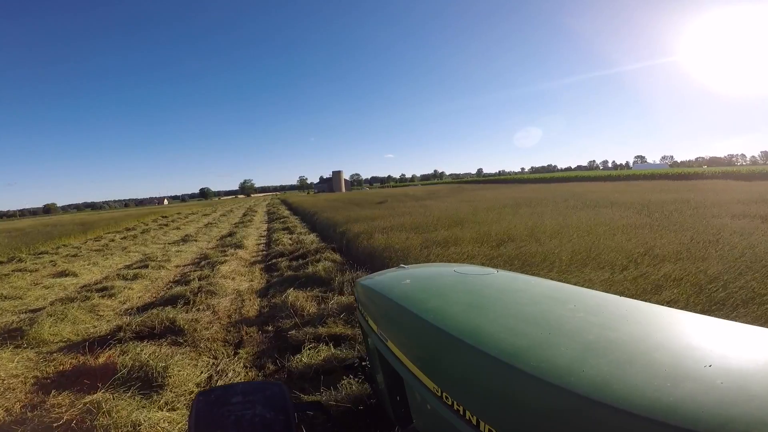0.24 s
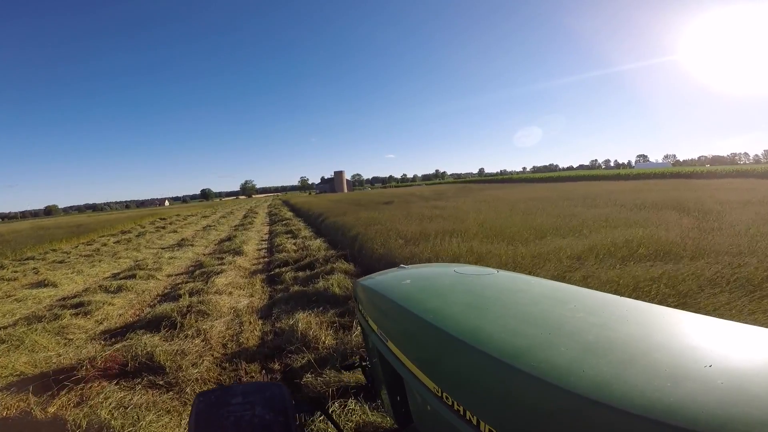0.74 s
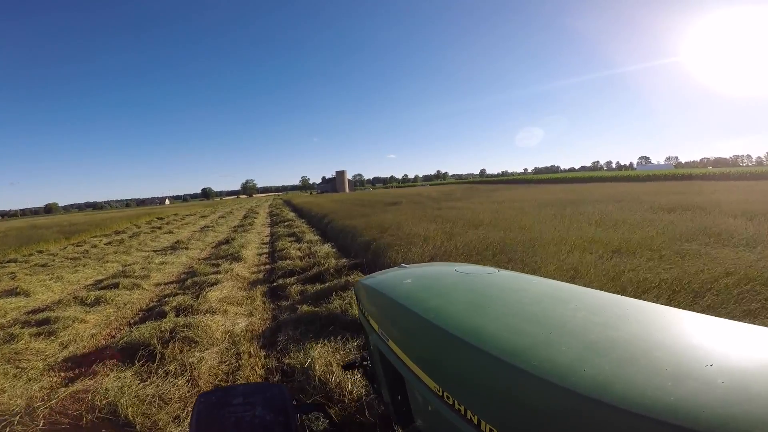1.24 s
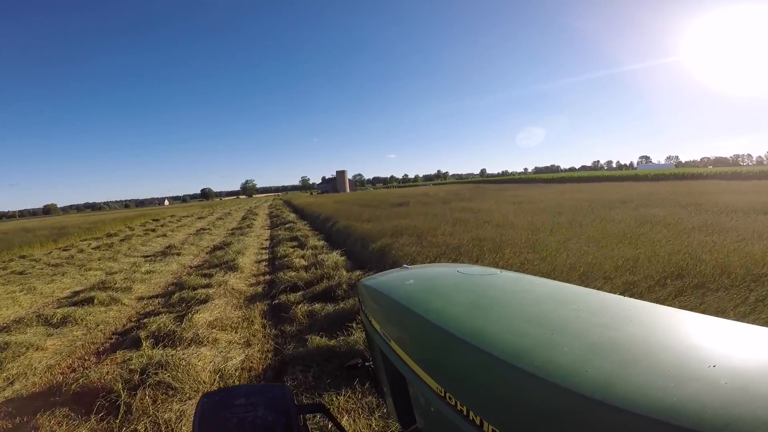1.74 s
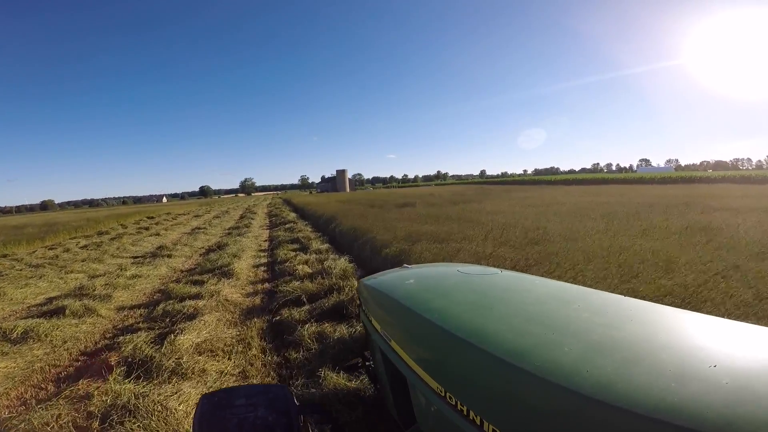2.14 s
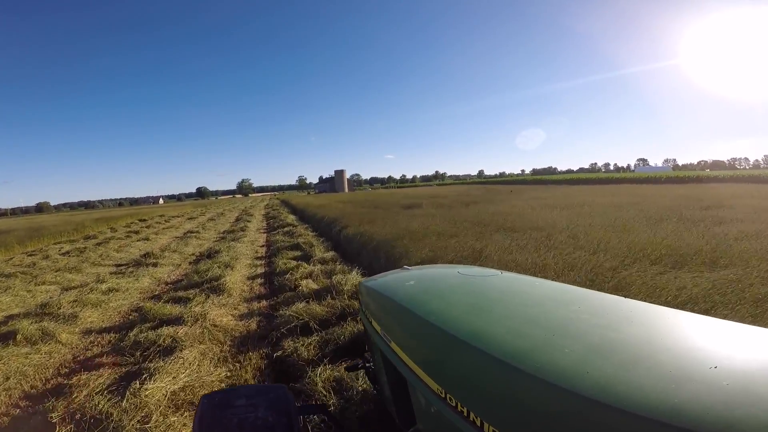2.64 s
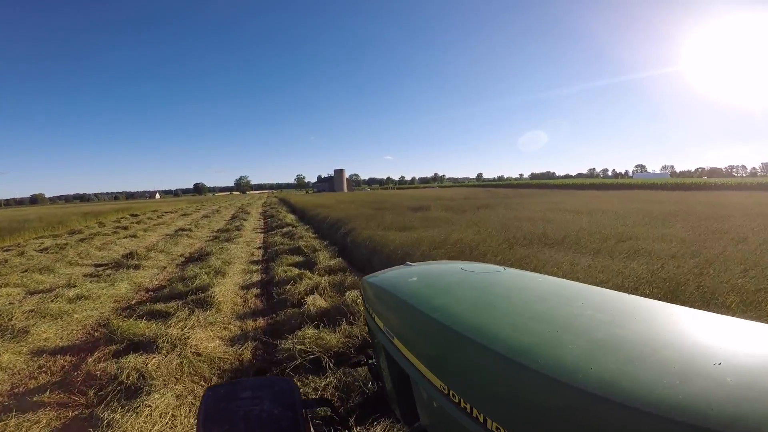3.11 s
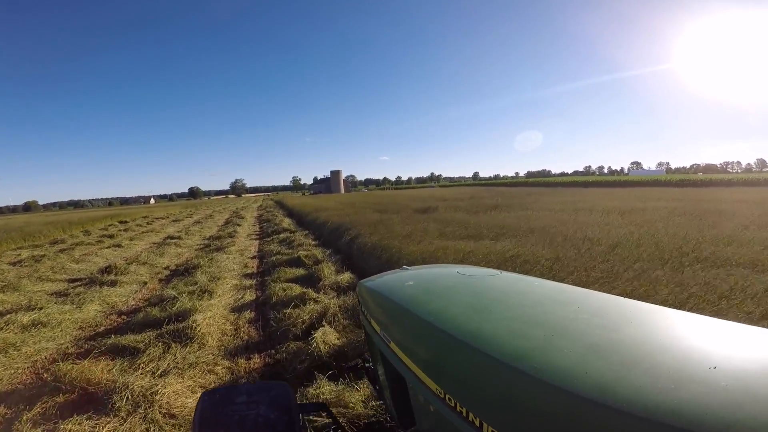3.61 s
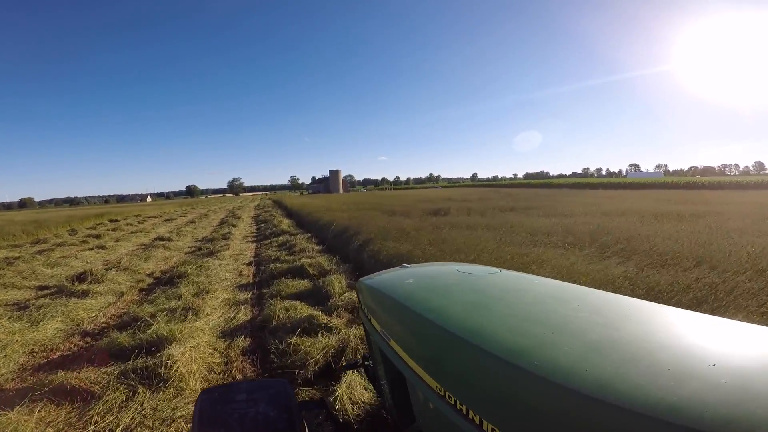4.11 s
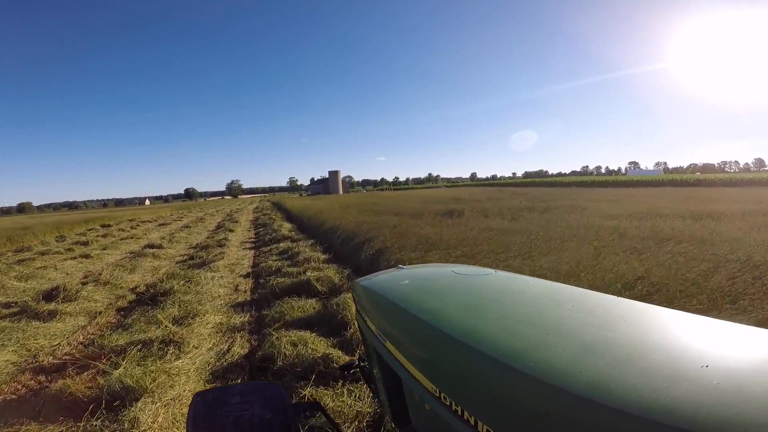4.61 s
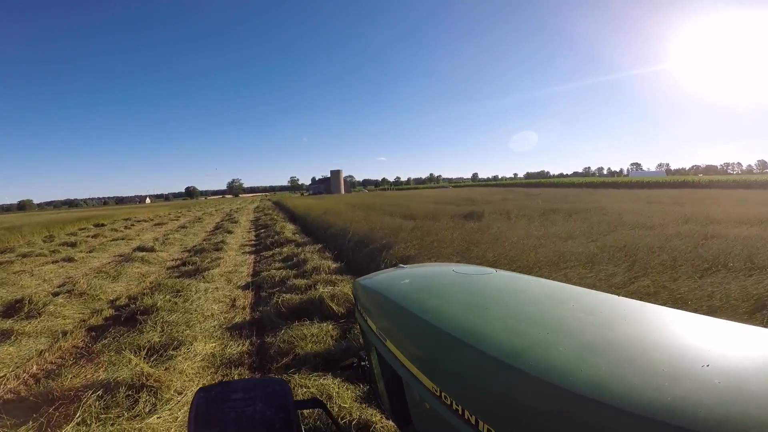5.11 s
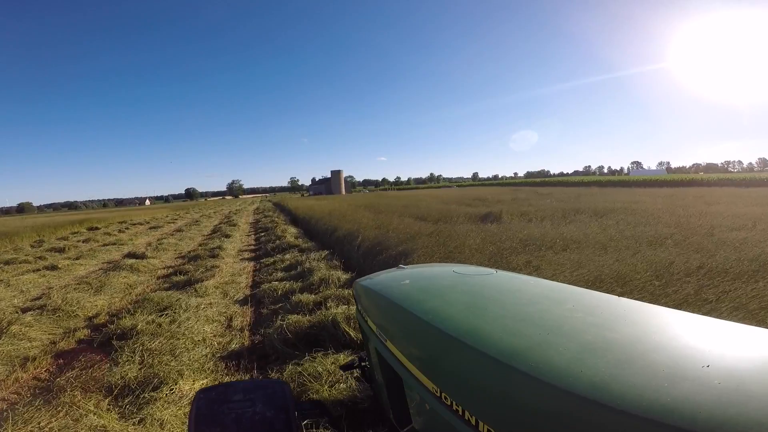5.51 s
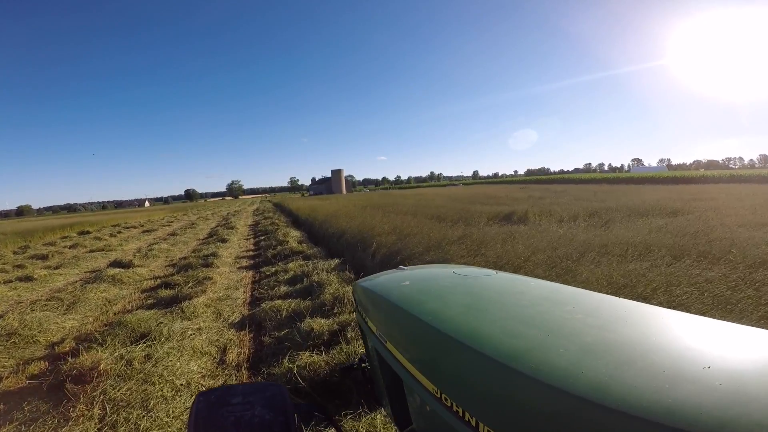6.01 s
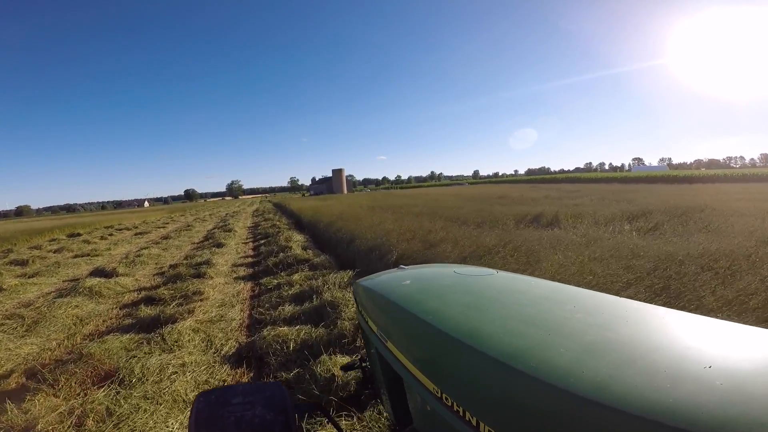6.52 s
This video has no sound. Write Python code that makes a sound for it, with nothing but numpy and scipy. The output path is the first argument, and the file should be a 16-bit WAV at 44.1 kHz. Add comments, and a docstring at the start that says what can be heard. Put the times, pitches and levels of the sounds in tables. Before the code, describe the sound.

A tractor diesel drones steadily under load at close range while a mower hums and slashes tall grass with a rough, surging rush.

```python
"""Tractor mowing tall grass

A six-cylinder diesel tractor pulls a disc mower through tall grass, heard from the tractor itself.
The exhaust drones on tones locked to the engine cycle; shaped noise makes the knocks and valve clatter.
The mower discs hum as tones, and their cutting is noise that surges with the crop.
The driveline drones, the hood booms, panels and tyres rumble over the field, and fan air and stalks hiss."""
import sys
import numpy as np
from scipy import signal
from scipy.fft import rfft, irfft
from scipy.io import wavfile
from scipy.ndimage import uniform_filter1d

SR = 44100
rng = np.random.default_rng(int(sys.argv[2]) if len(sys.argv) > 2 else 0)


def digitize_waveform(pressure):
    """Quantize a signal to 16-bit integers and store it at the path in sys.argv[1].

    Rows of a 2-D input are taken as channels; values are limited to [-1, 1].
    """
    field = np.atleast_2d(pressure).T
    bounded = np.clip(field, -1, 1)
    quanta = np.round(bounded * 32767).astype(np.int16)
    wavfile.write(sys.argv[1], SR, quanta)


N = 297675
T = np.arange(N) / SR  # time of each sample [s]


def undb(db):
    """Turn decibels into a gain."""
    return 10 ** (np.asarray(db) / 20)


def unit(x):
    """Scale a signal to an rms of 1."""
    return x / np.sqrt(np.mean(x ** 2))


def curve(table):
    """Join the points of a (time [s], value) table by straight lines."""
    return np.interp(T, *np.transpose(table))


def noise():
    """Make white noise, which holds all pitches equally."""
    return rng.standard_normal(N)


def walk(rate):
    """Draw a smooth random curve of rms 1 that changes about rate times a second."""
    knots = rng.standard_normal(1024)
    jagged = np.interp(T * rate, np.arange(len(knots)), knots)
    return unit(uniform_filter1d(jagged, int(SR / rate / 2) + 1))


def frequencies():
    """List the frequencies of the spectrum [Hz], kept at 1 or above to allow logs and division."""
    return np.maximum(np.fft.rfftfreq(N, 1 / SR), 1)


def colour(x, points):
    """Shape a sound by a (frequency [Hz], level [dB]) spectrum, then scale it to rms 1."""
    hz, db = np.transpose(points)
    gain_db = np.interp(np.log(frequencies()), np.log(hz), db)
    return unit(irfft(rfft(x) * undb(gain_db), N))


def ring(x, modes):
    """Pass a sound through steep (frequency [Hz], width [Hz], level [dB]) resonances; rms 1."""
    f = frequencies()
    power = 0
    for hz, width, db in modes:
        band = undb(db) / (1 + .5j * hz / width * (f / hz - hz / f)) ** 2
        # separate resonances add in power, so no notch forms between them
        power = power + np.abs(band) ** 2
    return unit(irfft(rfft(x) * np.sqrt(power), N))


def tone(turns, waver_db, wander, rate):
    """Make a sine from a count of turns; its level wavers [dB] and its phase wanders [radians]."""
    phase = 2 * np.pi * (turns + rng.random()) + wander * walk(rate)
    return np.sqrt(2) * np.sin(phase) * undb(waver_db * walk(rate))


def swell(s, length):
    """Rise and fall in a bell shape around time s; length is its standard deviation [s]."""
    return np.exp(-.5 * ((T - s) / length) ** 2)


def spell(start, length, attack, release):
    """Rise, hold, then die away; all times in seconds."""
    rise = np.clip((T - start) / attack + .5, 0, 1)
    return rise * np.exp(-np.maximum(T - start - length, 0) / release)


# engine load, as a change in loudness: (time [s], level [dB])
ENGINE_LOAD = [(0, -0.5), (.5, -1.6), (.9, -.5), (1.6, -3), (2.3, 0.5), (3.5, 0.5), (4.05, -0.5),
               (4.7, 2.3), (5.3, 2.5), (6, 1), (6.75, 2)]


def engine_load():
    """Follow the load [dB] that strengthens knock, panel rumble, hiss and exhaust tones."""
    return curve(ENGINE_LOAD)


# thickness of the crop at the knives, as a level before cutting is lifted 0.08 dB: (time [s], level [dB])
CROP_THICKNESS = [(0.0, -49), (0.22, -44.5), (0.76, -47.5), (0.91, -42), (0.97, -45.5), (1.31, -48),
                  (1.47, -51.5), (2.44, -46.5), (3.23, -50.5), (3.58, -45.5), (3.6, -47.5), (4.12, -49.5),
                  (4.16, -48), (5.95, -46.5), (6.19, -49.5), (6.7, -45)]


def crop_level():
    """Follow the crop thickness [dB] that drives both cutting and hiss."""
    return curve(CROP_THICKNESS)


# spectrum of the tyre rumble: (frequency [Hz], level [dB])
TYRE_SPECTRUM = [(12, -5), (24, 0), (35, 1.5), (46, -5), (70, -4.5), (140, -12), (400, -71)]
# bumps in the field that thud through the tyres: (time [s], level [dB])
FIELD_BUMPS = [(.93, -45), (2.31, -52), (3.55, -58), (5.93, -50)]
BUMP_S = 0.065  # standard deviation of each thud's bell shape [s]
ROLLING_DB, ROLLING_SWAY_DB = -53, 1  # rolling level and the spread of its sway [dB]


def tyres():
    """Rolling over stubble makes an uneven low rumble, and each bump briefly swells it to a thud."""
    rolling = undb(ROLLING_DB + ROLLING_SWAY_DB * walk(6))
    thuds = sum(undb(db) * swell(s, BUMP_S) for s, db in FIELD_BUMPS)
    return colour(noise(), TYRE_SPECTRUM) * np.hypot(rolling, thuds)


# spectrum of fan air and stalks: (frequency [Hz], level [dB])
AIR_SPECTRUM = [(1500, -20), (2800, 1.5), (3900, 3.5), (4700, -1), (5200, 0.5), (5650, -2), (6500, 0),
                (7050, -7), (8150, -7.5), (9000, -14), (10000, -24), (10700, -31), (12500, -38.5),
                (14000, -54)]
HISS_DB = -59.5  # level before crop and load change it [dB]
HISS_PER_CROP, HISS_PER_LOAD = 0.41, .42  # dB gained below the top for each dB of crop and of load
TOP_PER_LOAD = 2  # dB the top gains for each dB of load


def air(cycle, firings):
    """Fan air and flying stalks hiss, throbbing with the engine; crop and load change the level."""
    crop_db, load_db = crop_level(), engine_load()
    cycle_throb = 0.59 * np.sin(2 * np.pi * cycle)
    firing_throb = 0.33 * np.sin(2 * np.pi * firings)
    throb_db = cycle_throb + firing_throb + 0.44 * walk(40)
    hiss = undb(HISS_DB) * colour(noise() * undb(throb_db), AIR_SPECTRUM)
    # the part above 8000 Hz follows the load alone
    high_pass = signal.butter(2, 8000, "high", fs=SR, output="sos")
    top = signal.sosfiltfilt(high_pass, hiss)
    surge_db = HISS_PER_CROP * (crop_db - crop_db.mean()) + HISS_PER_LOAD * load_db
    return (hiss - top) * undb(surge_db) + top * undb(TOP_PER_LOAD * load_db)


# body panel resonances: (frequency [Hz], width [Hz], level [dB])
PANEL_MODES = [(67, 16.7, 6), (98, 17.6, 7), (110, 12, 3.5), (128, 13, 3), (179, 26, 0), (276.5, 18, 0.5),
               (299.7, 30, 1), (350, 60, -7), (450, 91, -10)]


def panels():
    """Body panels rumble as noise rings their resonances, a little louder under load."""
    return undb(engine_load() * 0.42 - 43.0) * ring(noise(), PANEL_MODES)


# spells in which the hood booms: (start [s], length [s], level [dB])
BOOM_SPELLS = [(0.372, 0.085, -38), (0.903, 0.42, -39), (1.368, 0.2, -38)]
BOOM_HZ = 97.04  # a little below the firing rate, so the two beat
BOOM_REST_DB, BOOM_ATTACK_S, BOOM_RELEASE_S = -51.5, 0.039, .07


def hood_boom():
    """The hood booms at its own fixed pitch, louder in spells and never below a resting level."""
    spells = [undb(db) * spell(s, length, BOOM_ATTACK_S, BOOM_RELEASE_S) for s, length, db in BOOM_SPELLS]
    level = np.maximum(np.max(spells, axis=0), undb(BOOM_REST_DB))
    return tone(BOOM_HZ * T, waver_db=1, wander=0.57, rate=10) * level


# level of the deep driveline drone, which swells and sinks: (time [s], level [dB])
DRONE_LEVEL = [(0, -44), (.35, -54), (.7, -44.5), (1, -53), (1.75, -51), (1.95, -41.5), (2.25, -43.5),
               (2.92, -37.5), (3.25, -43), (3.48, -39.5), (3.85, -40), (4.3, -52.5), (4.6, -46),
               (5.02, -57), (5.2, -39), (5.55, -44), (6.3, -46.5), (6.75, -39.5)]
DRONE_PER_CYCLE = 3.26  # swings of the drone per engine cycle


def driveline_drone(cycle):
    """The driveline drones at a deep pitch that follows the engine speed."""
    return tone(DRONE_PER_CYCLE * cycle, waver_db=1.7, wander=0.091, rate=6.5) * undb(curve(DRONE_LEVEL))


# mower disc speed: (time [s], speed [turns per second])
DISC_TURN_RATE = [(0, 44.2), (1.3, 43.7), (2.2, 44.4), (3.8, 44.4), (4.8, 44), (5.5, 43.4), (6.75, 43.2)]
# mower disc tones: (multiple of the disc turn, level [dB])
DISC_HUM = [(2, -50.5), (3, -50.5), (4, -57), (6, -55.5)]


def disc_hum():
    """Spinning discs hum at multiples of their turning rate."""
    turns = np.cumsum(curve(DISC_TURN_RATE)) / SR
    return sum(undb(db) * tone(multiple * turns, waver_db=2.0, wander=0.34, rate=5.4)
               for multiple, db in DISC_HUM)


# spectrum of knives slashing grass: (frequency [Hz], level [dB])
CUTTING_SPECTRUM = [(140, -15), (240, 3.5), (400, 0), (600, 0), (820, -2), (1030, 0.5), (1280, -5),
                    (1430, -8.5), (1900, -9), (2350, -10.5), (2800, -17.5), (4000, -25.5), (7000, -56.5),
                    (10000, -63), (13000, -79)]


def cutting():
    """Knives slash the crop: flickering noise that surges with the crop thickness."""
    flicker = undb(1.0 * walk(60))
    return colour(noise() * flicker, CUTTING_SPECTRUM) * undb(crop_level() + 0.08)


# clumps of grass ring the mower deck, and at the last a stalk scrapes past; length is a standard deviation:
# (time [s], frequency [Hz], width [Hz], length [s], level [dB])
GRASS_CLUMPS = [(0.318, 1040, 80, .015, -44.5), (0.435, 614, 70, 0.015, -43.5),
                (0.887, 975, 350, 0.027, -50), (1.34, 1040, 130, 0.02, -51), (3.525, 970, 300, 0.1, -51),
                (3.565, 4400, 220, .008, -62)]


def clumps():
    """Each clump or stalk makes a short swell of noise through one resonance."""
    return sum(undb(db) * swell(s, length) * ring(noise(), [(hz, width, 0)])
               for s, hz, width, length, db in GRASS_CLUMPS)


# engine block and cover resonances: (frequency [Hz], width [Hz], level [dB])
BLOCK_MODES = [(705, 240, -2), (1028, 106, -1.5), (1226, 115, 4), (1555, 83, -1.5), (1814, 130, -1),
               (2048, 132, 0.5), (2310, 200, -5)]
# knock strength of each cylinder in firing order: (level [dB])
CYLINDER_KNOCK = [-0.7, -2.5, -0.5, -1, -1.5, -1]


def knock(cycle, firings):
    """Each firing rattles the block; the valve gear adds a clatter that repeats every cycle."""
    strength = undb(CYLINDER_KNOCK)[firings.astype(int) % len(CYLINDER_KNOCK)]
    # each firing jumps up, then fades towards a steady part
    burst = strength * (.65 + np.exp(-(firings % 1) / .35))
    taps = rng.standard_normal(2048)
    clatter = np.interp(cycle % 1, np.linspace(0, 1, len(taps)), taps)
    return undb(engine_load() - 52.5) * ring(burst * (noise() + 0.87 * clatter), BLOCK_MODES)


# exhaust and gear tones, level at zero load: (multiple of the two-turn engine cycle, level [dB])
ENGINE_ORDERS = [(8, -58), (9, -56), (11, -60.5), (12, -63.5), (16, -65), (18, -55), (19, -68.5), (23, -68),
                 (24, -58), (33, -70), (36, -72), (38, -64.5), (39, -71), (40, -66.5), (42, -66.5),
                 (43, -68.5), (70, -65.5), (75, -71.5), (87, -74), (102, -78.5), (118, -67.5)]
FIRING_DB = -43.5  # level of the firing tone [dB]


def exhaust(cycle, firings):
    """The firing tone sounds with weaker orders from unequal cylinders; load lifts high ones most."""
    load_db = engine_load()
    total = undb(FIRING_DB) * tone(firings, waver_db=2.0, wander=0.05, rate=5.3)
    for order, db in ENGINE_ORDERS:
        level = undb(db + min(order / 45, 1.5) * load_db)
        total = total + level * tone(order * cycle, waver_db=2.5, wander=0.31, rate=6)
    return total


# engine speed: (time [s], speed [firings per second])
FIRING_RATE = [(0, 104.6), (.7, 104.7), (1.1, 104.4), (1.6, 104.8), (2.7, 105.1), (3.4, 104.7),
               (3.9, 104.95), (4.2, 104.6), (4.7, 104.85), (5, 104.4), (5.5, 104.45), (5.9, 104),
               (6.3, 104.35), (6.75, 103.8)]


def scene():
    """One crankshaft times the engine and driveline; field and mower sounds join them."""
    firings = np.cumsum(curve(FIRING_RATE)) / SR
    cycle = firings / len(CYLINDER_KNOCK)
    field = tyres() + air(cycle, firings)
    body = panels() + hood_boom() + driveline_drone(cycle)
    mower = disc_hum() + cutting() + clumps()
    engine = knock(cycle, firings) + exhaust(cycle, firings)
    return (field + body + mower + engine)[None]


TOP_HZ = 13700


def record(dry):
    """Cut the sound steeply above TOP_HZ."""
    low_pass = signal.ellip(8, .2, 70, TOP_HZ, fs=SR, output="sos")  # 0.2 dB ripple, 70 dB cut
    return signal.sosfilt(low_pass, dry)


dry = scene()
out = record(dry)
digitize_waveform(out)
```